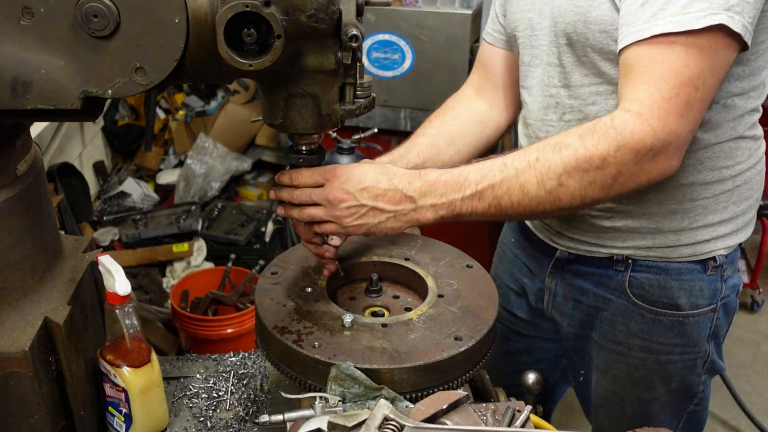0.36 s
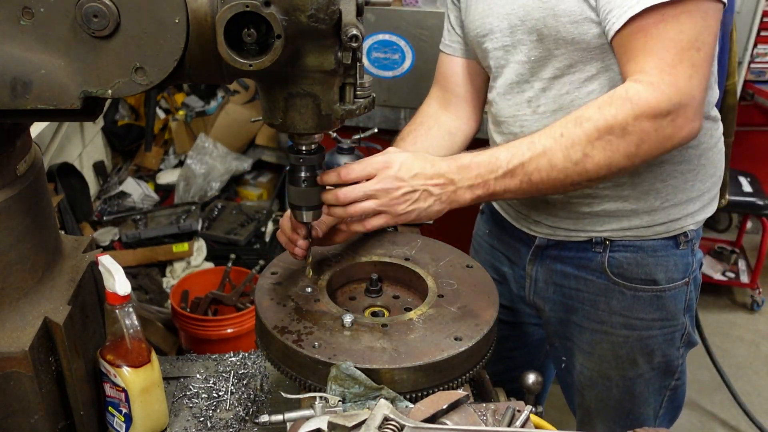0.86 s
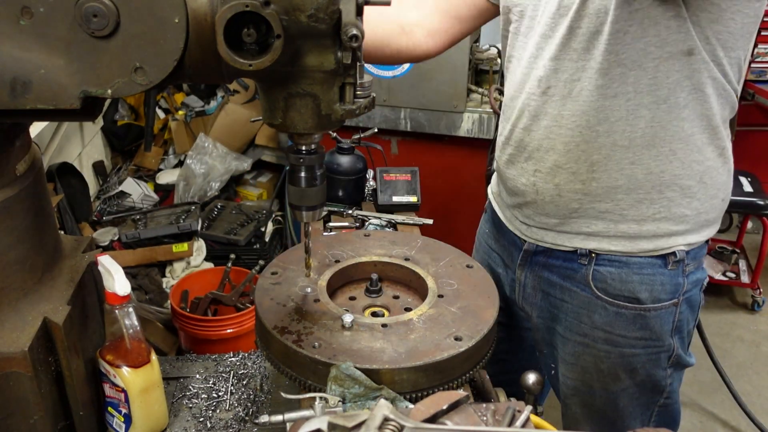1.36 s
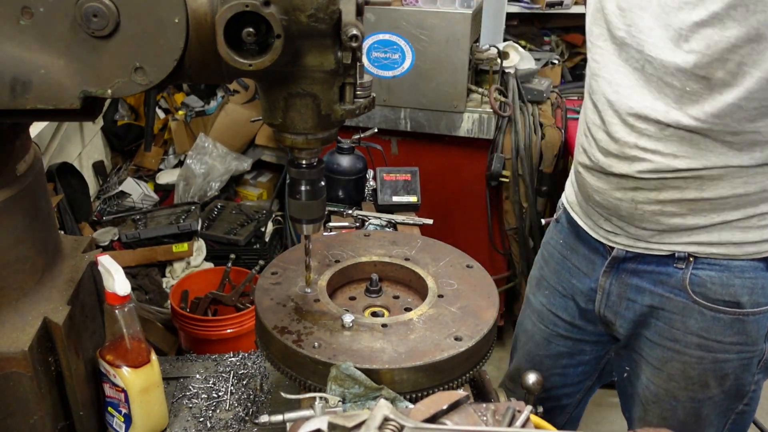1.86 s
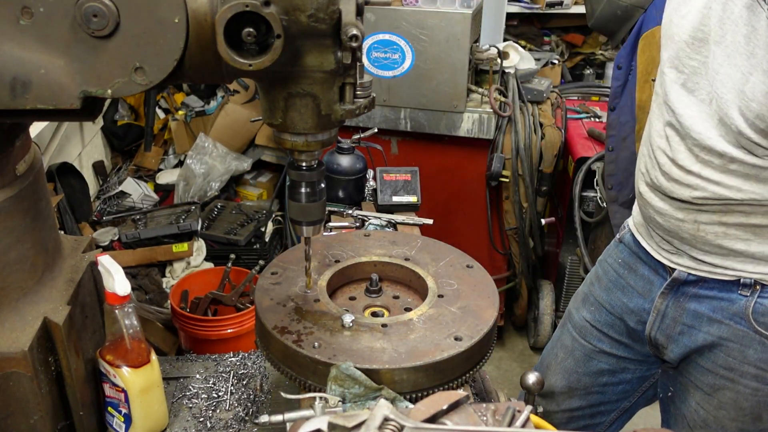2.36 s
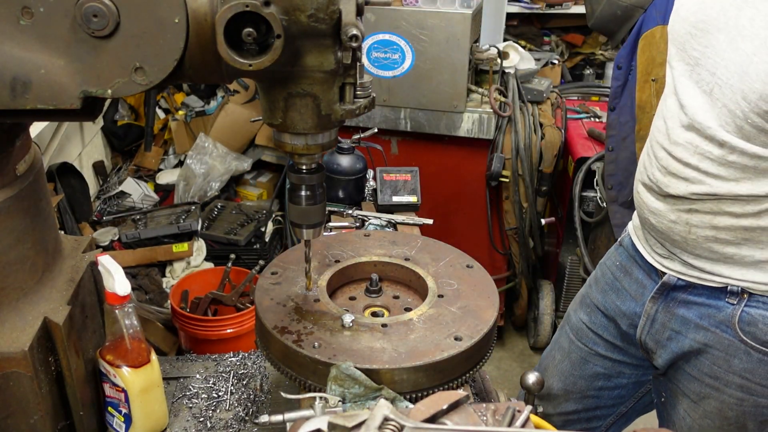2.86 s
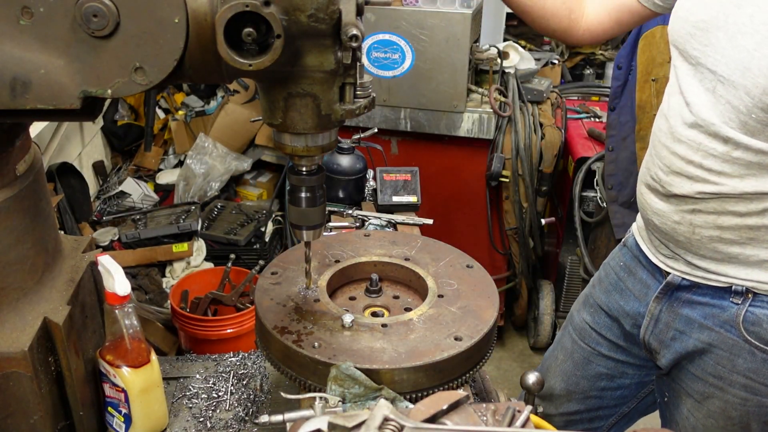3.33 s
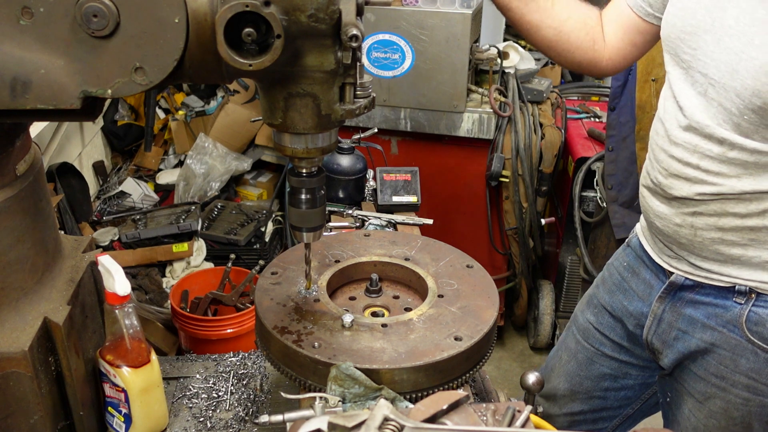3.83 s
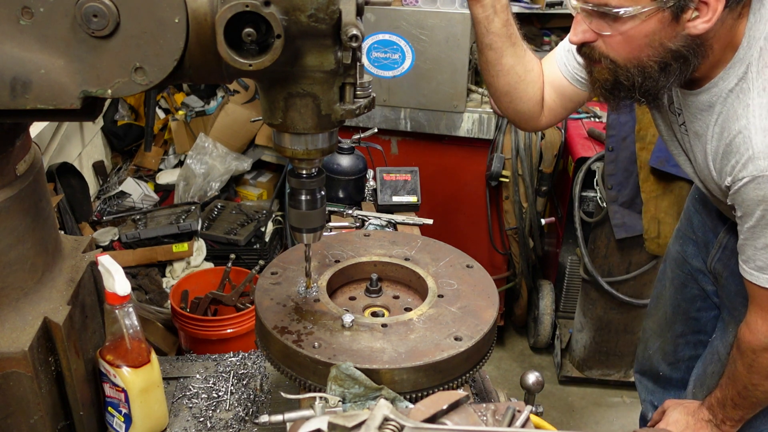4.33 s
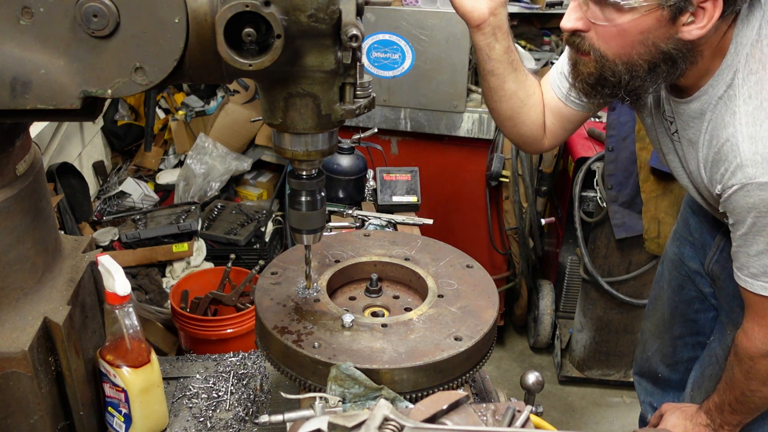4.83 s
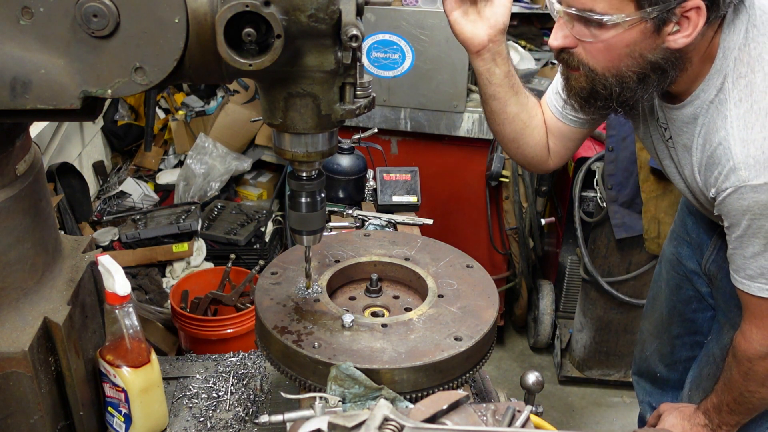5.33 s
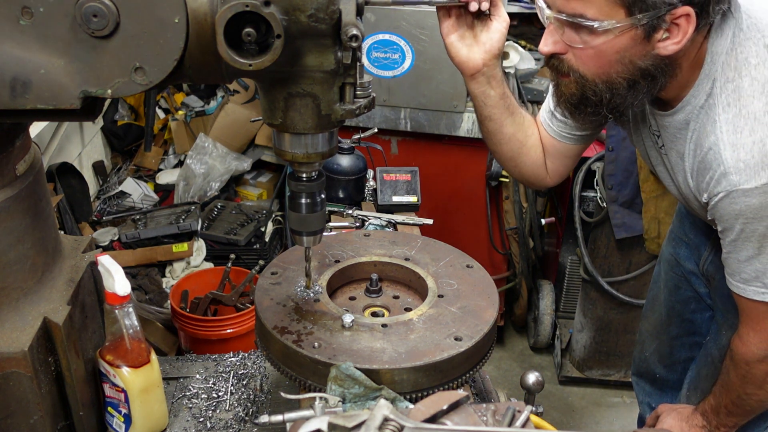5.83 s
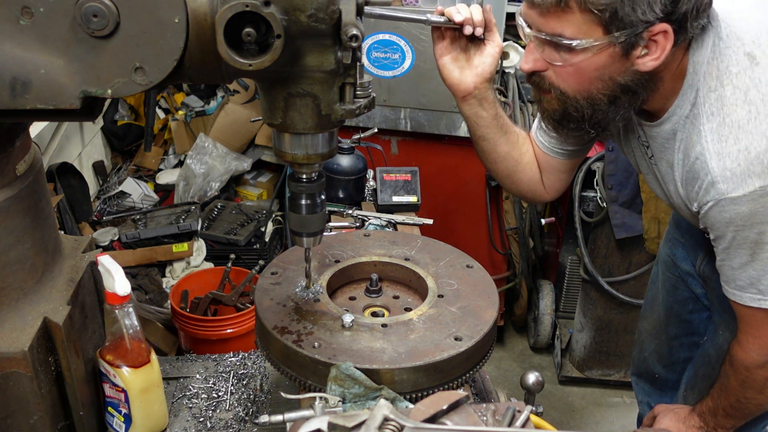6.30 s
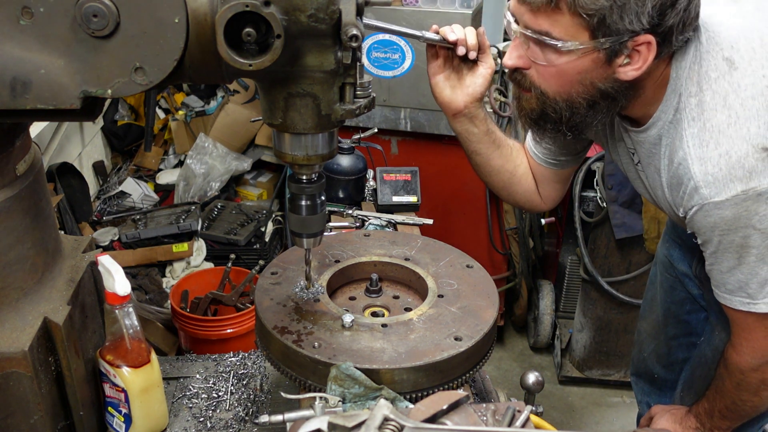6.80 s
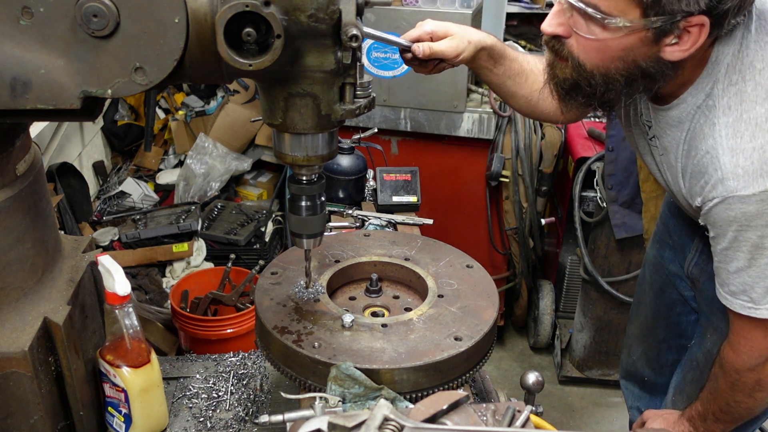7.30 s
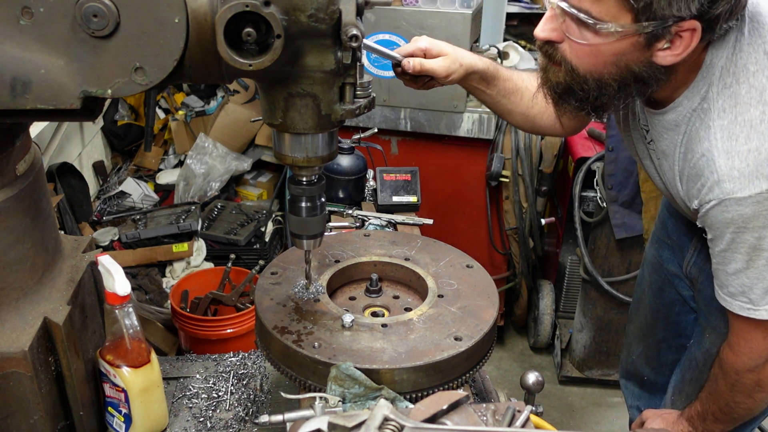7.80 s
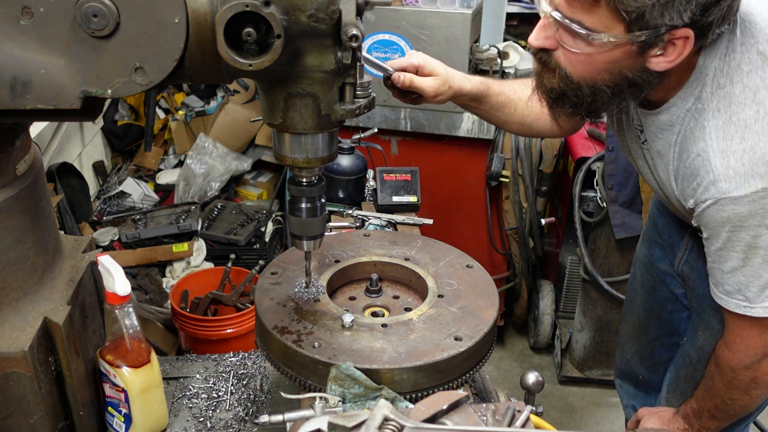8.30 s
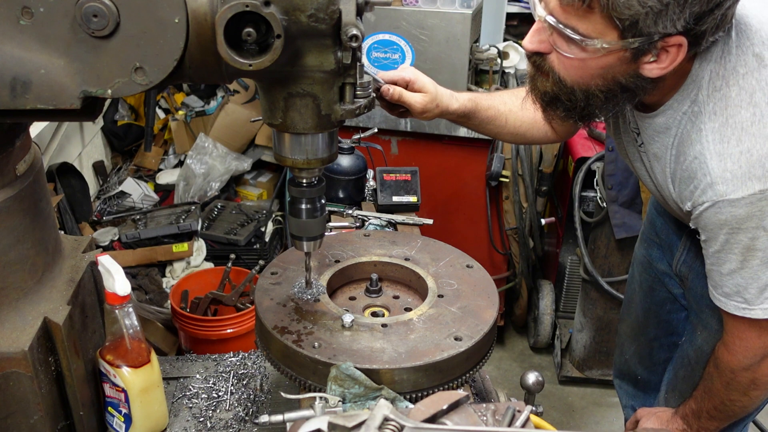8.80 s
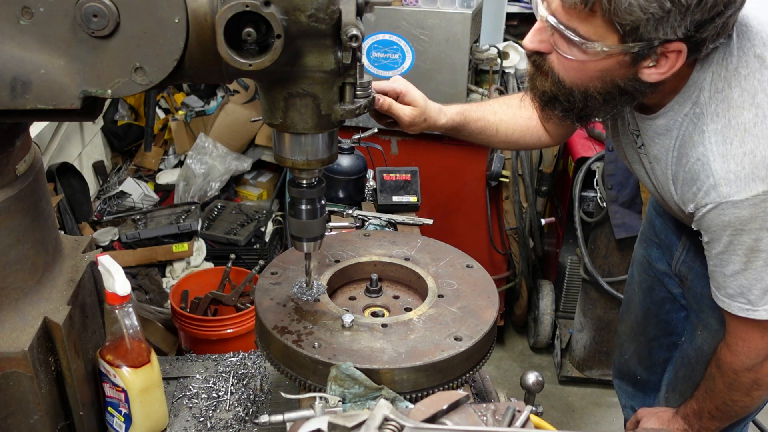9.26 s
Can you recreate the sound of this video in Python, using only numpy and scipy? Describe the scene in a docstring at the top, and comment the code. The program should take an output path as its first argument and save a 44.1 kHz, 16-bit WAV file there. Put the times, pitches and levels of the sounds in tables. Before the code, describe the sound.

A milling spindle runs up from near silence, its gears tick, then a drill bites steel with sustained, fluttering high whine and throbbing metallic hiss.

```python
"""A milling machine runs up and drills steel in a quiet workshop where a small fan idles.
Its gear train whines in sine tones tied to the turning shaft, fluttering as the teeth take load.
Shaped noise makes a hiss that rings the cast head and throbs with shaft and spindle; bursts make ticks.
Behind them lie soft air noise and the fan's thin, slightly wavering tones."""
import sys
import numpy as np
from scipy import signal
from scipy.io import wavfile
from scipy.ndimage import uniform_filter1d

SR = 44100
rng = np.random.default_rng(int(sys.argv[2]) if len(sys.argv) > 2 else 0)


def transcribe(u):
    """Save the signal u as a 16-bit wav file named by the first command-line argument.

    u: samples, shape (n,) or (channels, n), limited to [-1, 1]; the rate is SR.
    q: integer samples, one column per channel.
    """
    v = np.clip(np.atleast_2d(u).T, -1, 1)
    q = np.round(v * 32767).astype(np.int16)
    wavfile.write(sys.argv[1], SR, q)


def magnitude_from_level(level_db):
    """Linear magnitude for a level in decibels (20 dB per decade)."""
    exponent = np.asarray(level_db, float) / 20
    return 10 ** exponent


N = 414540
T = np.arange(N) / SR
HZ = np.fft.rfftfreq(2048, 1 / SR)[:, None]  # frequencies of the noise frames
FRAME_S = (np.arange(N // 512 + 5) * 512 / SR)[None]  # times of the noise frames

SPINDLE_RATIO = 26 / 81  # spindle turns per shaft turn
TOUCH_S = 2.48  # the feed engages


def evened(x):
    """Scales to rms 1."""
    return x / np.sqrt(np.mean(x ** 2) + 1e-20)


def read(points, hz):
    """Looks up a spectrum on a log-frequency axis."""
    f, value = np.transpose(points)
    return np.interp(np.log(hz + 1), np.log(f + 1), value)


def drift(rate_hz, count):
    """Random wander of rms 1 up to about rate_hz, one row a voice."""
    knots_per_s = 150
    knots = rng.standard_normal((int(N / SR * knots_per_s), count))
    memory = np.exp(-2 * np.pi * rate_hz / knots_per_s)
    knots = signal.lfilter([1], [1, -memory], knots, axis=0)
    return np.array([np.interp(T * knots_per_s, np.arange(len(k)), evened(k - k.mean())) for k in knots.T])


def bump(hz, centre_hz, width, db):
    """Power that one resonance adds to a flat floor of 1."""
    return (magnitude_from_level(db) ** 2) / (1 + (2 * (hz - centre_hz) / width) ** 2)


def noise(power, side, lean_db, patchy_db):
    """Stereo noise of a given power over frequency and time, with random louder and softer patches."""
    a, b, c, d, patch = rng.standard_normal((FRAME_S.size, HZ.size, 5)).T
    patch = uniform_filter1d(patch, size=16, axis=0)  # smooth over frequency
    patch = evened(uniform_filter1d(patch, size=5, axis=1))  # smooth over time
    mid = a + 1j * b
    off = (c + 1j * d) * magnitude_from_level(read(side, HZ))
    left = (mid + off) * magnitude_from_level(lean_db / 2)
    right = (mid - off) / magnitude_from_level(lean_db / 2)
    z = np.array([left, right]) * np.sqrt(power) * magnitude_from_level(patchy_db * patch)
    return signal.istft(z, nperseg=2048, noverlap=1536)[1][:, :N]


def slack(column):
    """Sum of one column of the slack table, held for each row's length with softened edges."""
    # moments when the feed slackens: (t/s, length/s, change of gear tones/dB, change of hiss/dB)
    eased = [(2.615, 0.049, -10, 0.5), (3.145, 0.012, -4, 1), (3.563, 0.054, -5.5, 1),
             (7.055, .11, -14, -0.5)]
    held = sum(row[column] * ((T > row[0]) & (T < row[0] + row[1])) for row in eased)
    return uniform_filter1d(held, size=300)


def shaft():
    """Drive shaft: adding up its speed gives the turns made; speed is 1 at full speed."""
    # it runs up, sags under the cut and recovers when the feed eases: (t/s, speed/turns per s)
    run = [(1.55, 2.0), (1.8, 18.0), (2.0, 31.5), (2.15, 43.5), (2.35, 50.6), (2.55, 50.82), (3.0, 50.73),
           (3.22, 50.7), (3.39, 50.58), (3.63, 50.58), (3.75, 50.83), (3.9, 50.82), (4.25, 50.61),
           (5.4, 50.69), (7.02, 50.69), (7.12, 50.82), (7.45, 50.7), (9.2, 50.745)]
    per_s = np.interp(T, *np.transpose(run), left=0)
    return np.cumsum(per_s) / SR, per_s / 50.7


def gears(turns, speed):
    """Tones tied to the shaft; the off-centre spindle gear gives them uneven sidebands."""
    # gear tones before load and flutter, every 26th is the tooth mesh:
    # (multiple of shaft speed, base level/dB rms, left minus right/dB)
    gear_tones = [(6, -101.0, 0.0), (8, -96.0, -0.0), (10, -96.0, -0.0), (11, -90.0, 0.0),
                  (13, -92.0, -0.0), (14, -89.0, -0.0), (15, -87.0, -0.0), (22, -80.0, 0.0),
                  (24, -84.0, 0.0), (26, -73.0, -0.0), (29, -72.0, 0.0), (31, -68.0, -0.0),
                  (33, -73.0, -0.0), (35, -65.0, -4.0), (37, -66.0, 0.0), (38, -74.0, 0.0),
                  (41, -72.0, 0.0), (42, -74.0, -0.0), (52, -61.0, 0.0), (58, -64.0, 0.0), (68, -65.0, 1.0),
                  (70, -67.0, -1.0), (72, -68.0, 0.0), (74, -69.0, 0.0), (75, -65.0, 2.0), (76, -63.0, 1.0),
                  (77, -67.0, 1.0), (78, -49.0, 2.0), (79, -64.0, 1.0), (81, -65.0, 0.0), (96, -75.0, 1.0),
                  (103, -68.0, -0.0), (104, -64.0, 1.0), (105, -77.0, 1.0), (111, -68.0, 2.0),
                  (113, -74.0, -0.0), (117, -75.0, 1.0), (122, -77.0, 0.0), (128, -72.0, 0.0),
                  (130, -67.0, -2.0), (139, -64.0, 1.0), (154, -74.0, 1.0), (156, -69.0, 3.0),
                  (157, -74.0, 0.0), (178, -78.0, 3.0), (182, -69.0, -1.0), (191, -78.0, 0.0),
                  (208, -74.0, 2.0)]
    # hum of belt, idler and bearings, off the whole multiples:
    # (multiple of shaft speed, base level/dB rms, left minus right/dB)
    idler_tones = [(5.08, -101, 0), (7.52, -89, 0), (8.02, -95, 0), (8.6, -93, 0), (10.28, -89, 0),
                   (10.76, -89, 0), (11.8, -93, 0), (20.4, -78, 0), (20.88, -79, 0), (26.92, -77, 0),
                   (39.16, -71, 0), (39.48, -71, 0), (40.36, -70, 0), (66.7, -67, 0), (158.48, -74, 0)]
    tones = gear_tones + idler_tones

    spindle = np.exp(2j * np.pi * (SPINDLE_RATIO * turns + 0.12))
    # a strong upper and weak lower sideband, and a second lower one
    wobble = 1 + .22 * spindle - .02 / spindle + .1 / spindle ** 2

    since = np.maximum(T - TOUCH_S, 0)
    load = 1 - np.exp(-since / 0.32)  # the teeth take load with this time constant in s
    slack_db = slack(column=2)
    low_free_db, low_loaded_db = -9, 0.5  # up to the 40th multiple
    low_db = low_free_db + (low_loaded_db - low_free_db) * load + slack_db
    high_touch_db, high_loaded_db, growth_db_per_s = -10.5, -3, .5  # above the 40th
    high_db = high_touch_db + (high_loaded_db - high_touch_db) * load + growth_db_per_s * since + slack_db
    low = magnitude_from_level(low_db) * speed ** 2 * wobble
    high = magnitude_from_level(high_db) * np.minimum(since / 0.018, 1) * wobble  # silent until the touch

    free_db, loaded_db = 6.5, 1.5  # chatter calms under load and grows when the feed slackens
    chatter_db = free_db + (loaded_db - free_db) * load - 0.44 * slack_db
    swell = drift(30, count=8) * chatter_db  # teeth bear unevenly, so each tone flutters
    shaky = turns + .0004 * drift(12, count=1)[0] * chatter_db  # backlash jitters the turning angle

    start = rng.random((len(tones), 1))
    out = np.zeros((2, N))
    for k, (order, db, pan_db) in enumerate(tones):
        engaged = high if order > 40 else low
        tone = (engaged * np.exp(2j * np.pi * (order * shaky + start[k]))).real
        flutter_db = swell[k % 8]  # eight flutters shared among the tones
        out += np.sqrt(2) * magnitude_from_level(db + flutter_db) * tone * magnitude_from_level([[pan_db / 2], [-pan_db / 2]])
    return out


def grit(per_s, size, taps):
    """Gain with short rounded swells where chips break and teeth strike, scaled to rms 1."""
    strength = np.minimum(rng.exponential(size, N), 2.5 * size)
    hits = (rng.random(N) < per_s / SR) * strength
    return evened(1 + signal.oaconvolve(hits, np.hanning(taps), "same"))


def head_ring():
    """Power gain of the cast head's resonances, plus broad scrapes as the drill enters."""
    # resonances: (f/Hz, width/Hz, then added power over the hiss/dB
    # while running up, as the drill enters, once it cuts steadily)
    resonances = [(255, 12, 4, 4, 4), (420, 60, 3, 3, 4), (530, 40, 4, 4, 4), (1040, 50, 5, 5, 6),
                  (1400, 150, 1, 5, 0), (1580, 120, 5, 8, 6), (1800, 120, 2, 4, 4), (2030, 130, 6, 6, 9),
                  (2420, 150, 3, 3, 3), (2950, 90, 8, 7, 7), (3370, 120, 8, 8, 9), (3520, 200, 10, 6, 6),
                  (3800, 150, 5, 3, 4), (4150, 220, 6, 5, 6), (4860, 200, 1, 1, 2), (5250, 120, 1, 4, 4),
                  (5620, 90, 3, 3, 6), (6550, 200, 2, 2, 3), (7060, 120, 5, 7, 6), (7950, 150, 3, 5, 5),
                  (8170, 100, 6, 5, 2), (8800, 100, 2, 3, 2), (9220, 100, 1, 6, 4), (9930, 300, 2, 5, 4),
                  (10540, 50, 0, 3, 4), (12000, 500, 2, -3, 1), (12700, 600, 1, -2, 2),
                  (13700, 150, 2, 2, 1), (15250, 250, 2, 1, 3), (15640, 150, 6, 4, 6)]
    # (t/s, stage: 0 running up, 1 entering, 2 cutting)
    settling = [(2.46, 0), (2.5, 1), (3.68, 1), (3.76, 2)]
    # three broad scrapes: ((f/Hz, width/Hz, added power over the hiss/dB) at the start, the same at the end)
    scrapes = [
        [(7000, 1700, 9), (8600, 1500, -14)],
        [(8900, 1200, 1.5), (9840, 570, 8.5)],
        [(14650, 500, 10), (14500, 400, 1)],
    ]

    stage = np.interp(FRAME_S, *np.transpose(settling))
    ring = 1 + sum(bump(HZ, hz, w, np.interp(stage, range(3), dbs)) for hz, w, *dbs in resonances)
    scrape_end_s = 3.7
    entering = (FRAME_S > TOUCH_S) & (FRAME_S < scrape_end_s)
    for ends in scrapes:
        glide = (np.interp(FRAME_S, [TOUCH_S, scrape_end_s], c) for c in np.transpose(ends))
        ring = ring + entering * bump(HZ, *glide)
    return ring


def hiss(turns, speed):
    """Bearing and cutting noise rings the head and throbs with the shaft and the spindle."""
    # basic colour of the noise: (f/Hz, relative level/dB)
    colour = [(18, -80), (30, -37.5), (173, -53), (381, -37.5), (1030, -15.5), (1210, -16.5), (1830, -8),
              (2260, -13), (2580, -4.5), (3620, -6.5), (3920, -7), (4580, -9), (6970, -10), (7540, -12),
              (15700, -22.5)]
    # nominal level and colour at full speed; the hiss grows in proportion to speed:
    # (t/s, level/dB, treble tilt/dB per octave, bass lift/dB per two octaves)
    course = [(1.7, -47.5, -1, 3.5), (2.05, -47.5, 3, 4.5), (2.46, -47, 3.5, 3.5), (2.56, -48.5, 3.6, 1.5),
              (2.8, -46.5, 3.5, 1.5), (3.2, -45, 2.5, 1), (3.7, -45.5, 3, 4), (4.5, -44.5, 2.5, 1.1),
              (6.5, -45, 2.5, 1), (7.1, -46, 3.1, 1.5), (7.6, -45.5, 3, 1), (9.4, -46.5, 3.5, 1.5)]
    # hollows where reflections cancel, below 0 a lift: (f/Hz, width/Hz, depth/dB)
    hollows = [(1134, 280, 8), (1760, 85, 11.5), (2280, 150, 0.5), (2700, 140, 13), (4870, 88, 3),
               (5340, 70, 10.5), (5840, 200, 4.5), (7550, 440, 3), (8400, 180, -1.5), (11100, 700, 2),
               (14050, 300, -1)]
    # stereo width: (f/Hz, side minus mid/dB)
    side = [(60, -22), (250, -30), (500, -41), (1500, -51), (1700, -24), (2100, -28.5), (2800, -29.5),
            (3300, -13.5), (3800, -19), (4400, -11.5), (6000, -16.5), (6700, -12.5), (8200, -15.5),
            (9000, -13.5), (11500, -17.5), (12800, -13.5), (14200, -22), (15400, -11)]
    # stereo balance: (f/Hz, left minus right/dB)
    lean = [(2600, 0), (3300, 1.3), (3700, .6), (4100, 1.3), (4800, .6), (5400, 1.1), (8000, .8),
            (15000, .5)]
    # level throb: (beats per shaft turn, swing either way/dB, phase lead/beats)
    throbs = [(SPINDLE_RATIO, .4, .1), (2 * SPINDLE_RATIO, .65, .3), (1, .8, .2), (2, .7, .4), (3, .3, .6),
              (5 * SPINDLE_RATIO, .4, .2)]

    s, level_db, tilt_db, bass_db = np.transpose(course)
    ring = head_ring()
    octaves = np.log2((HZ + 1) / 3500)
    colour_db = read(colour, HZ) + np.interp(FRAME_S, s, tilt_db) * np.maximum(octaves, 0)
    colour_db = colour_db + np.interp(FRAME_S, s, bass_db) * np.clip(-octaves / 2, 0, 2)
    colour_db = colour_db - sum(db / (1 + (2 * (HZ - hz) / w) ** 2) for hz, w, db in hollows)
    x = evened(noise(magnitude_from_level(colour_db) ** 2 * ring, side, read(lean, HZ), patchy_db=0.82))

    throb_db = sum(db * np.cos(2 * np.pi * (rate * turns + lead)) for rate, db, lead in throbs)
    flutter_db = .4 * drift(35, count=1)[0]
    x = x * grit(per_s=200, size=.2, taps=90)
    return x * speed * magnitude_from_level(np.interp(T, s, level_db) + slack(column=3) + throb_db + flutter_db)


def ticks():
    """Short knocks of slack gears, each a fading noise burst through the head's main band."""
    # during run-up and first contact: (t/s, gain before the fade/dB)
    knocks = [(1.928, -41.5), (2.1094, -44), (2.1779, -42), (2.2418, -39), (2.477, -33), (2.489, -35),
              (2.5094, -37), (2.6094, -36), (2.6706, -42)]
    out, t = np.zeros(N), np.arange(1500) / SR
    band = signal.butter(2, [1400, 4500], "band", fs=SR)
    for (s, db), burst in zip(knocks, rng.standard_normal((len(knocks), 1500))):
        knock = signal.lfilter(*band, burst) * magnitude_from_level(db - 60 * t / 0.046)  # fades at 60 dB per 46 ms
        out[round(s * SR):][:1500] += knock * np.minimum(t / 0.00167, 1)
    return out


def fan():
    """Whine of the idling fan: sines whose pitch and level waver a little."""
    # (f/Hz, level before swell and easing/dB rms)
    lines = [(1060, -76.5), (1586, -81.5), (3055, -68.5), (3168, -88.5), (3582, -80.5), (3872, -85.5),
             (4130, -80.5), (5051, -73.5), (6196, -84.5), (6529, -80.5), (6884, -87), (8158, -85.5),
             (8567, -85), (9793, -82), (11423, -85)]
    out = magnitude_from_level(-101) * np.sin(2 * np.pi * 258.4 * T)  # a faint steady hum
    sway, swell = drift(3.07, count=len(lines)), drift(12, count=len(lines))
    eased_db = np.interp(T, [1.8, 2.5], [0, 3])  # the whine eases down and sits 3 dB lower from 2.5 s on
    for (hz, db), s, w in zip(lines, sway, swell):
        level = np.sqrt(2) * magnitude_from_level(db + 1.9 * w - eased_db)
        out = out + level * np.sin(2 * np.pi * np.cumsum(hz + 3 * s) / SR)
    return out


def idle_air():
    """Soft air noise of the idle shop, coloured by broad and narrow bumps."""
    # (f/Hz, relative level/dB)
    air_colour = [(18, -15), (30, -28), (130, -85), (250, -33.5), (835, -8.5), (1030, -7.5), (1270, -10),
                  (1610, -9.5), (2640, -11.5), (3090, -7), (3350, -9.5), (5230, -8), (5800, -9.5),
                  (6610, -10), (15700, -17)]
    # (f/Hz, width/Hz, added power over the noise/dB)
    air_bumps = [(440, 19, 4.5), (947, 57, 8), (1077, 46, 9.5), (1174, 47, 6.5), (1585, 93, 2.5),
                 (3020, 320, -7), (3220, 250, 1), (1740, 120, 6.5), (3420, 38, 4.5), (7260, 120, 1)]
    # stereo width: (f/Hz, side minus mid/dB)
    side = [(60, -15), (200, -17), (700, -37), (1500, -19.5), (2400, -18.5), (4400, -8.5), (8100, -7),
            (15000, -9)]
    power = magnitude_from_level(read(air_colour, HZ)) ** 2 * (1 + sum(bump(HZ, *row) for row in air_bumps))
    return magnitude_from_level(-62) * evened(noise(power, side, 0.48, patchy_db=1.56))


def dips():
    """Gain that makes the whole sound dip briefly, each dip a smooth bell shape in dB."""
    # (t/s, change at the deepest point/dB, nominal width/s)
    dip_rows = [(2.521, -7, .014), (3.607, -5, .006), (6.402, -3.5, .013), (7.07, -3, .016),
                (7.145, -2.5, .016), (7.79, -12, .006), (7.909, -7, .005), (7.972, -7.5, .006),
                (8.147, -8.5, .008), (8.582, -4.5, .004), (8.864, -3.5, .016), (8.936, -4.5, .009)]
    return magnitude_from_level(sum(db * np.exp(-((T - s) / (.7 * w)) ** 2) for s, db, w in dip_rows))


def scene():
    """The running machine over the idle shop."""
    turns, speed = shaft()
    mix = gears(turns, speed) + hiss(turns, speed) + ticks() + fan() + idle_air()
    return mix * dips()


def roll_off(x):
    """The treble ends steeply here."""
    return signal.sosfilt(signal.butter(12, 16880, fs=SR, output="sos"), x)


def record(dry):
    """Cuts off the treble steeply above 15745 Hz."""
    edge = signal.firwin(2047, 15745, window=("kaiser", 9), fs=SR)
    finished = signal.oaconvolve(dry, edge[None], "same")
    return roll_off(finished)


dry = scene()
out = record(dry)
transcribe(out)
```